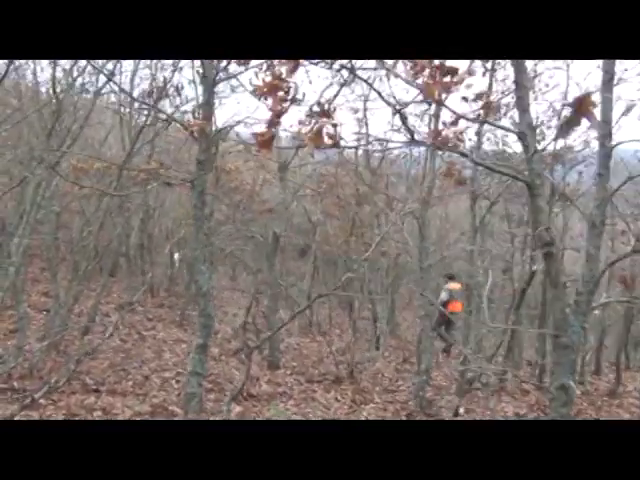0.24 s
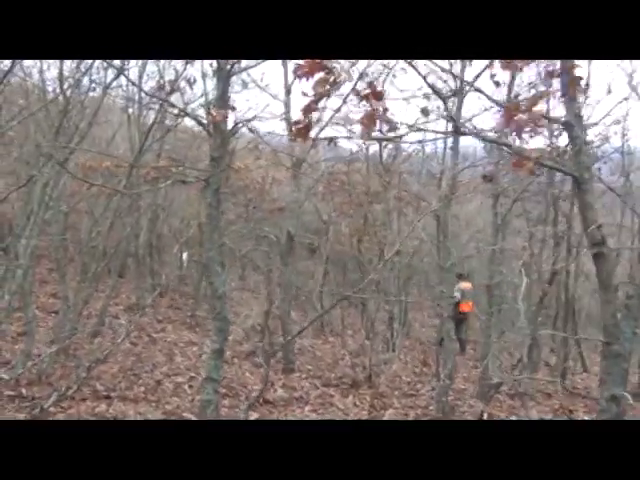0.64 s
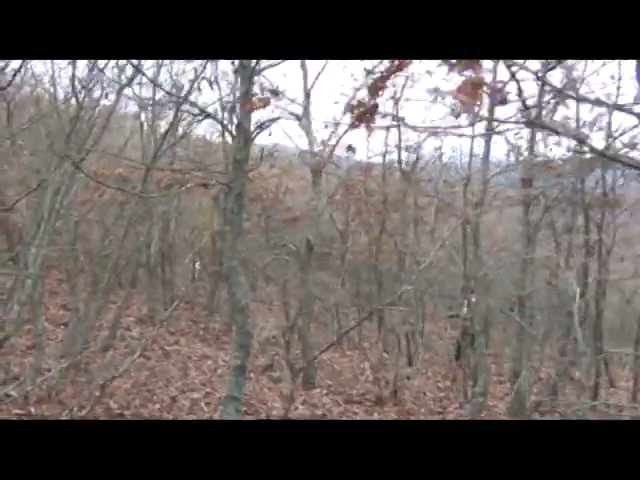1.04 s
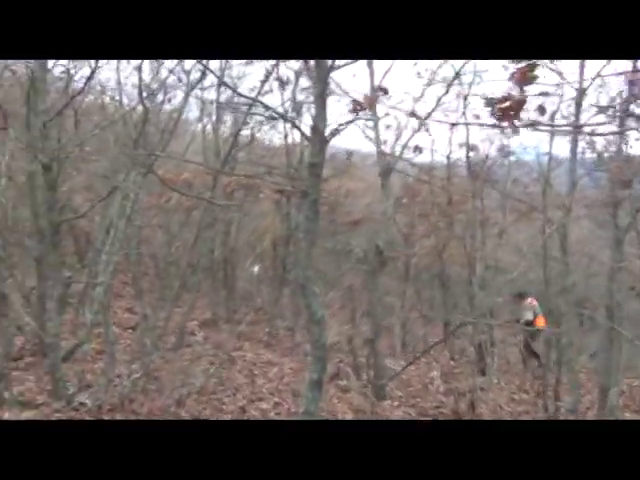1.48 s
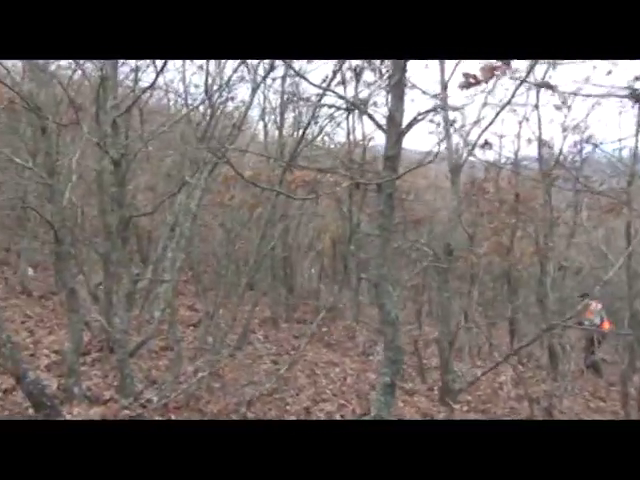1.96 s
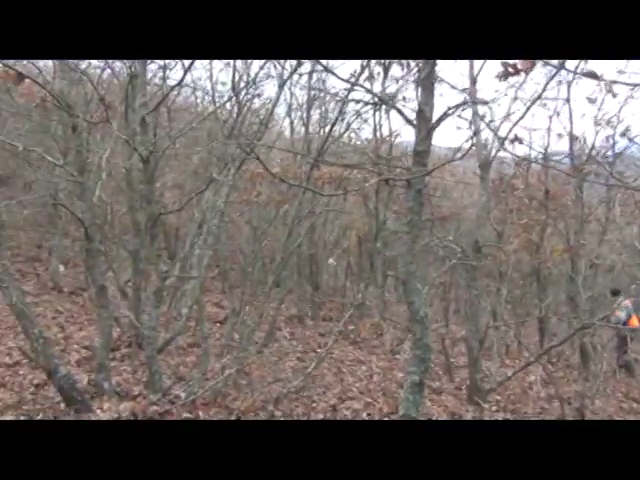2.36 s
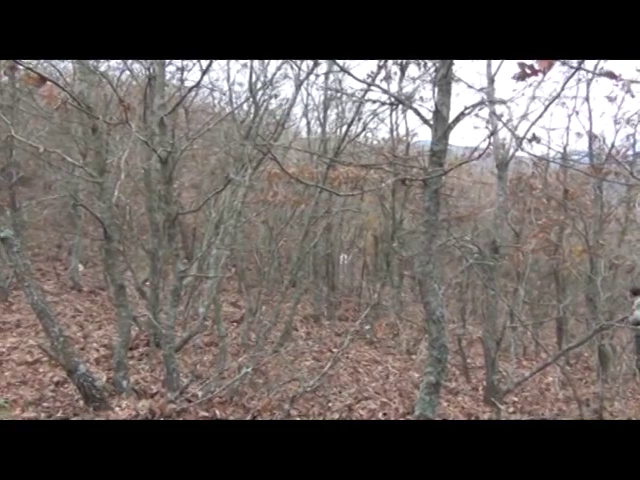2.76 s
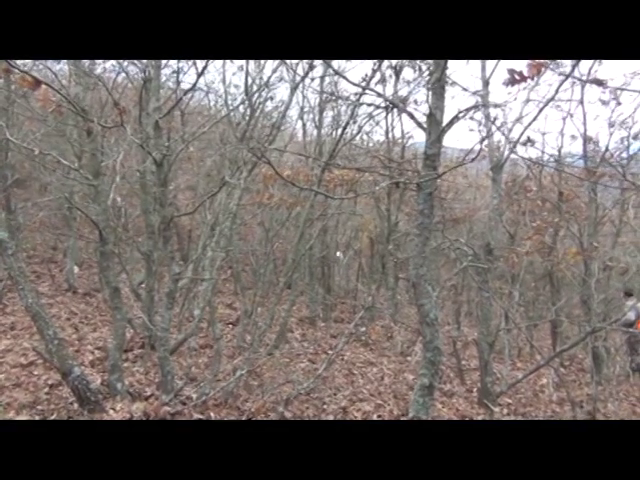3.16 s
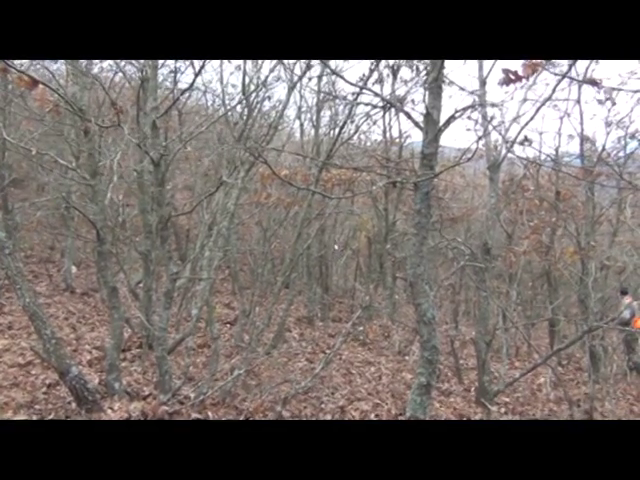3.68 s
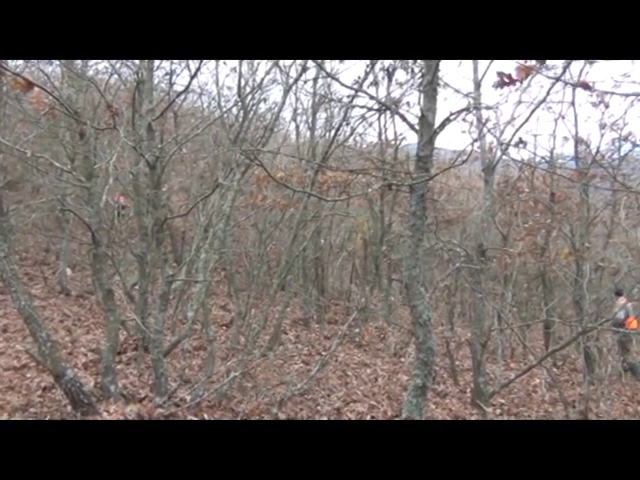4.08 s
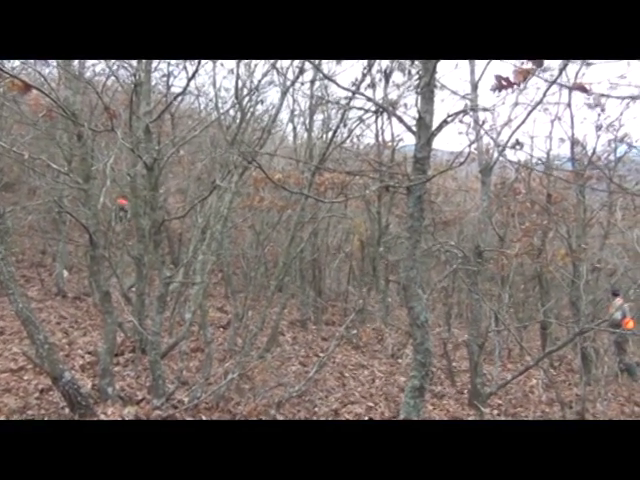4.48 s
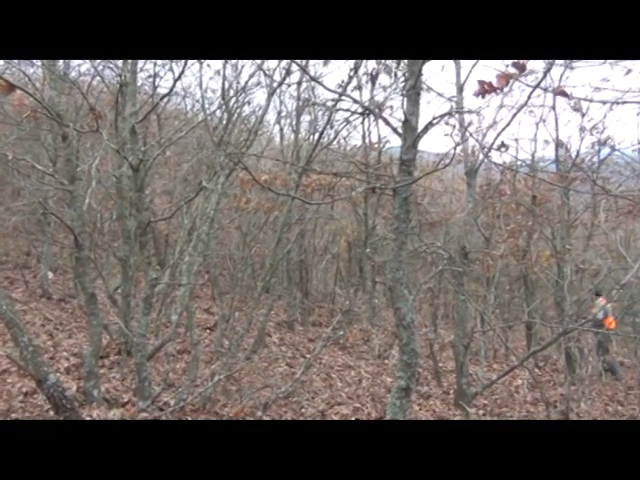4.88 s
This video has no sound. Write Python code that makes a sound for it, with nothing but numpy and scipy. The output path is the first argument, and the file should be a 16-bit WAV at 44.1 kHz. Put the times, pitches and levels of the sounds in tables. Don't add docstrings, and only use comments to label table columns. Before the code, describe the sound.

Feet crunch through dry leaves with snaps and dull knocks, then stop; small collar bells clank in the brush while a bird whistles briefly.

```python
import sys
import numpy as np
from scipy import signal
from scipy.fft import rfft, irfft, next_fast_len
from scipy.io import wavfile
from scipy.ndimage import uniform_filter1d, map_coordinates

SR = 44100
rng = np.random.default_rng(int(sys.argv[2]) if len(sys.argv) > 2 else 0)


def voltage_ratio(level):
    return 10 ** (np.asarray(level, float) / 20)


def generate_wav(sig):
    pcm = np.round(np.clip(np.atleast_2d(sig).T, -1, 1) * 32767).astype(np.int16)
    wavfile.write(sys.argv[1], SR, pcm)


N = 226193
HOP = 32

# [f/Hz, level/dB, t60/s]
LOW_BELL_MODES = [(1509, -6, 0.19), (1488, 0, 0.28), (1922, -21.5, 0.84), (3740, -18, 0.076),
                  (4084, -13.5, 0.34), (4350, -13, 0.42), (4340, -2, 0.18), (7550, -3, 0.36),
                  (7710, -0.5, 0.21), (11290, 1.5, 0.077), (11380, -2, 0.11), (8200, -7, 0.15),
                  (11800, -7, 0.1), (13310, -12, 0.065)]
HIGH_BELL_MODES = [(1572, 3.5, 0.15), (1547, -13.5, 0.33), (2170, -27, .2), (4400, 2, 0.22),
                   (4837, -1, 0.38), (7780, -3, 0.3), (8300, -6.5, 0.23), (11600, -3, 0.12),
                   (12900, -15, 0.12), (14250, -19, .06)]
LOW_COLLAR = (LOW_BELL_MODES, [3000, 6000, 10000])
HIGH_COLLAR = (HIGH_BELL_MODES, [3000, 4600, 6000])


def evened(x):
    return x / np.sqrt(np.mean(x ** 2) + 1e-20)


def smooth_noise(*widths):
    x = rng.standard_normal(N)
    for width in widths:
        x = uniform_filter1d(x, size=width)
    return evened(x)


def read(points, hz):
    f, value = np.transpose(points)
    return np.interp(np.log(hz + 1), np.log(f + 1), value)


def curve(rows):
    s, *columns = np.transpose(rows)
    return [np.interp(np.arange(N) / SR, s, c) for c in columns]


def coloured(x, points):
    size = next_fast_len(N, True)
    gain = voltage_ratio(read(points, np.fft.rfftfreq(size, 1 / SR)))
    return irfft(rfft(x, size) * gain, size)[..., :N]


def left_right(mid, side):
    return np.array([mid + side, mid - side])


def add(mix, s, sound):
    part = mix[..., round(s * SR):][..., :sound.shape[-1]]
    part += sound[..., :part.shape[-1]]


def placed(x, pan_db):
    return x * voltage_ratio(np.array([pan_db / 2, -pan_db / 2]).reshape(2, -1))


def ring(hz, t60, rise=0.00026):
    t = np.arange(int(min(0.7 * t60, 0.3) * SR) + 8) / SR
    decay_per_s = np.log(1000) / t60
    return np.exp((2j * np.pi * hz - decay_per_s) * t).imag * np.minimum(t / rise, 1)


def blurred(rows, width_hz):
    hz, db = curve(rows)
    t = np.arange(N) / SR
    pole = np.exp(-np.pi * width_hz / SR)
    two_poles = np.convolve([1, -pole], [1, -pole])
    slow = signal.lfilter([1], two_poles, [1, 1j] @ rng.standard_normal((2, N)))
    tone = evened((slow * np.exp(2j * np.pi * np.cumsum(hz) / SR)).real)
    return tone * voltage_ratio(db + 4.5) * (t > rows[0][0]) * (t < rows[-1][0])


def stroke(start, end, start_db, end_db, fall_db_per_s, rise_s):
    t = np.arange(0, N, HOP) / SR
    times = [start, (start + end) / 2, end + 1e-4, end + 2]
    levels = [start_db, (start_db + end_db) / 2, end_db, end_db - 2 * fall_db_per_s]
    return (voltage_ratio(np.interp(t, times, levels)) * np.clip(1 + (t - start) / rise_s, 0, 1)) ** 2


def in_db(power):
    return np.interp(np.arange(N), np.arange(0, N, HOP), 10 * np.log10(power + 1e-12))


def footwork():
    # [heel t/s, toe t/s, heel level/dB, toe level/dB, fall/(dB/s)]
    step_rows = [
        (0.0, 0.28, -29.5, -26.5, 77),
        (0.884, 1.085, -27.5, -22.5, 500),
        (1.116, 1.316, -28, -37, 402),
        (1.682, 1.702, -27.5, -27, 88),
        (1.78, 1.894, -33, -26, 179),
        (2.0, 2.026, -47, -46, 37),
    ]
    # [t/s, level/dB, crispness (highs re rustle)/dB]
    scuff_rows = [(.5, -42, -15), (.56, -49, 1), (.6, -39, -4), (.64, -40.5, -2.5), (.74, -41, -1),
                  (.8, -41, -15), (.845, -35, -7), (.69, -43.5, -3), (1.36, -42.5, 1), (1.41, -42.5, 3),
                  (1.63, -31.5, -0.5), (1.47, -39.5, -2), (1.54, -44, -3), (1.59, -46, -6),
                  (1.98, -38, 0.5), (2.1, -43.5, 2.5)]
    # [from t/s, to t/s, first level/dB, last level/dB, ground thud re level/dB]
    press_rows = [(0.0, 0.024, -35, -28, -27), (0.063, 0.26, -32.5, -29, -18),
                  (0.366, 0.5, -34.5, -27.5, -15), (0.53, 0.7, -46.5, -46, -0.5),
                  (.65, 0.75, -44.5, -43, -3), (.72, 1.04, -44, -38, -6), (0.786, 0.8, -26, -29, -11),
                  (0.85, 0.955, -26.5, -28, -4), (0.942, 1.105, -31, -24, -10),
                  (1.11, 1.25, -32, -32, -7.5), (1.24, 1.32, -33.5, -33, -11),
                  (1.32, 1.37, -40, -39.5, -5.5), (1.43, 1.7, -42.5, -48, -3),
                  (1.424, 1.414, -31, -25, -16), (1.52, 1.564, -35, -36, -2.5),
                  (1.588, 1.6, -31, -60, -9.5), (1.653, 1.75, -30.5, -35, -9.5),
                  (1.769, 2.06, -35, -40, -20), (1.901, 3.1, -50.5, -70, -8)]
    # [t/s, level/dB]
    paw_rows = [(2.349, -47), (2.435, -45.5), (2.52, -54), (2.605, -42.5), (2.72, -47.5), (2.825, -48.5),
                (2.901, -44), (3.045, -56), (3.16, -49.5), (3.21, -65), (3.36, -53), (3.43, -53),
                (3.51, -48), (3.59, -45), (3.66, -45.5), (3.71, -48.5), (3.8, -47.5), (3.87, -45.5),
                (3.95, -48.5), (4.059, -51), (4.135, -46), (4.21, -50.5), (4.3, -55), (4.455, -49.5),
                (4.629, -52), (4.69, -53), (4.75, -46), (4.87, -52), (4.92, -48), (5.03, -47.5)]
    step_crisp_db, far_crisp_db, still_db = -0.27, -0.5, -66.5
    steps = sum(stroke(*row, rise_s=0.051) for row in step_rows)
    far = voltage_ratio(2 * still_db) + sum(stroke(s, s, db, db, 102, 0.022) for s, db in paw_rows)
    scuffs = np.array([stroke(s, s, db, db, 242, 0.035) for s, db, _ in scuff_rows])
    presses = np.array([stroke(*row[:-1], 422, 0.029) for row in press_rows])

    bright = steps * voltage_ratio(2 * step_crisp_db) + far * voltage_ratio(2 * far_crisp_db)
    bright = bright + voltage_ratio(2 * np.transpose(scuff_rows)[2]) @ scuffs
    thud = voltage_ratio(2 * np.transpose(press_rows)[-1]) @ presses
    level_db = in_db(steps + far + scuffs.sum(0))
    weight_db = in_db(presses.sum(0))
    return level_db, in_db(bright) - level_db, weight_db, in_db(thud) - weight_db


def crackle(per_s, spread_db, hiss, clump_db, count=8):
    t = np.arange(128) / SR
    clumps = voltage_ratio(clump_db * smooth_noise(260))
    size = voltage_ratio(spread_db * np.minimum(rng.exponential(1, N), 3.6))
    size = size * (rng.random(N) < clumps * per_s / SR)
    kind = rng.integers(count, size=N)
    out = hiss * np.sqrt(clumps) * rng.standard_normal((2, N))
    for k, direction in enumerate(np.linspace(-1.6, 1.6, count)):
        decay_s = rng.uniform(0.0001, 0.0032)
        burst = evened(rng.standard_normal(len(t)) * np.exp(-t / decay_s))
        fractures = signal.oaconvolve(size * (kind == k), burst)[:N]
        out += np.array([[1], [direction]]) * fractures * 0.081
    return evened(out)


def snaps(level_db):
    # [t/s, peak level/dB, f/Hz]
    near_snaps = [(0.1207, -17.5, 5030), (0.1652, -16, 4100), (0.285, -23, 6000), (0.3, -34, 6160),
                  (0.338, -26.5, 2600), (0.393, -26, 6800), (0.574, -31.5, 8100), (0.64, -32, 5440),
                  (0.661, -41, 7000), (0.7248, -43, 9150), (0.852, -27, 2900), (0.916, -21, 6450),
                  (1.002, -17, 5860), (1.016, -14, 8700), (1.089, -27, 9000), (1.123, -24, 2850),
                  (1.549, -39.5, 8200), (0.5652, -26.5, 7200), (0.6002, -34, 3950), (0.616, -33, 7170),
                  (0.758, -37, 3230), (0.7645, -31, 7500), (0.8894, -35, 7260), (0.9326, -20, 8800),
                  (0.9752, -30, 6250), (1.0926, -16, 8900), (1.107, -25, 7340), (1.12, -31, 6840),
                  (1.3508, -48, 9000), (1.44, -39, 9000), (1.5207, -34.5, 6300), (1.6158, -27.5, 9100),
                  (1.659, -30, 6650), (1.8543, -24, 6750), (1.872, -16.5, 9620), (1.881, -17, 9600),
                  (1.894, -18, 9900), (1.9023, -22, 8860), (1.949, -28.5, 9300), (1.986, -17, 8780),
                  (2.0296, -32, 3050), (0.8325, -33, 3290), (0.848, -35, 2040), (1.509, -43, 9900),
                  (1.047, -18, 5270), (1.078, -27, 7000), (0.213, -22, 5600), (0.249, -35, 6500),
                  (0.495, -34, 4570), (1.928, -31, 8460), (2.012, -28, 7500), (2.037, -27.5, 9500)]
    # [t/s, peak level/dB, f/Hz]
    far_snaps = [
        (2.836, -35.5, 4420),
        (3.2315, -33, 3130),
        (3.2335, -28, 9800),
        (4.495, -44, 5200),
        (3.8, -49, 6300),
        (3.863, -39, 4400),
        (4.057, -36, 8900),
        (4.554, -41.5, 6360),
        (4.754, -37, 4700),
    ]
    rows = near_snaps + far_snaps
    out, t = np.zeros((2, N)), np.arange(256) / SR
    for (s, db, hz), noise in zip(rows, rng.standard_normal((len(rows), len(t)))):
        gain = voltage_ratio(db - level_db[round(s * SR)] + 1.5) * np.array([[1], [0.3]])
        crack = np.gradient(uniform_filter1d(noise, size=2)) * np.exp(-t / 0.0003)
        add(out, s, gain * evened(crack) * 0.15)
        add(out, s, gain * ring(hz, t60=15 / hz, rise=0.0001) * 1.4)
    return out


def leaves():
    # [f/Hz, density/dB]
    litter = [(35, -57), (60, -32.5), (278, -8.5), (393, -3.5), (442, -2), (753, -0.5), (1020, -1.5),
              (2300, -2), (3410, -3.5), (5170, -1), (6800, -0.5), (9240, 2), (15400, -10.5)]
    # [f/Hz, side re mid/dB]
    litter_side = [(60, -32), (180, -58), (550, -12.5), (1650, -24), (4970, -4.5), (15000, -1.5)]
    # [t/s, left re right/dB]
    sideways = [(0.0, 2), (0.37, 1), (0.88, 3.5), (2.03, 2), (2.29, -0.5), (3.87, 0), (4.21, -1),
                (4.53, -1), (4.71, -1), (5.13, 2)]
    level_db, crisp_db, weight_db, thud_db = footwork()
    mid, side = crackle(per_s=2200, spread_db=5.5, hiss=0.99, clump_db=2.5)
    both = np.array([mid, coloured(side, litter_side) * voltage_ratio(-3.0)])
    both = coloured(both + snaps(level_db), litter)

    thuds = coloured(both, [(300, 0), (480, -26.5)])
    lows = coloured(both, [(900, 0.0), (2200, -15)]) - thuds
    highs = coloured(both, [(6000, -25.0), (8500, -0.5)])
    body = both - thuds - lows - highs
    rustle = evened(body) * voltage_ratio(level_db - 0.73)
    rustle = rustle + evened(highs) * voltage_ratio(level_db + np.minimum(crisp_db, 4.5) + 0.93)
    ground = evened(lows) * voltage_ratio(weight_db - 7.5)
    ground = ground + evened(thuds) * np.array([[1], [0.45]]) * voltage_ratio(weight_db + thud_db - 4.0)
    turn = voltage_ratio(np.array([[0.5], [-0.5]]) * curve(sideways)[0])
    return left_right(*rustle) * turn + left_right(*ground) * turn ** 0.28


def knocks():
    # [t/s, peak level/dB, f/Hz]
    knock_rows = [(0.389, -10.5, 1600), (0.42, -25, 892), (0.451, -19, 710), (0.495, -19, 940),
                  (0.477, -13, 1100), (0.777, -17, 950), (0.797, -13, 730), (0.846, -17.5, 298),
                  (0.882, -19, 260), (0.929, -15.5, 610), (1.123, -33, 744), (1.15, -18.5, 590),
                  (1.074, -16, 840), (1.186, -17, 510), (1.2, -16, 900), (1.24, -29, 760), (1.1, -15, 790),
                  (.952, -14, 700), (0.96, -17, 1500), (1.4, -13, 1060), (.92, -23, 320), (0.32, -30, 324),
                  (1.263, -18, 780), (1.304, -21, 930), (1.5, -23, 534), (1.621, -19.5, 720),
                  (1.665, -16.5, 416), (4.74, -28, 820), (4.739, -42, 437), (4.74, -26, 1190)]
    out = np.zeros(N)
    for s, db, hz in knock_rows:
        add(out, s, ring(hz, t60=14 / hz, rise=0.41 / hz) * voltage_ratio(db - 2.0))
    return placed(out, 2.2)


def scrape():
    # [t/s, f/Hz, level/dB]
    path = [
        (.38, 1660, -46),
        (.392, 1683, -35),
        (.41, 1301, -38),
        (.43, 832, -43),
        (.455, 760, -41),
        (.48, 1033, -41),
        (.5, 772, -39),
        (.52, 690, -54),
    ]
    return blurred(path, width_hz=410)


def muted(sound, share):
    free_s, mute_s, mute_db = 0.0059, 0.0087, -4.5
    t = np.arange(len(sound)) / SR
    return sound * voltage_ratio(share * mute_db * np.clip((t - free_s) / mute_s, 0, 1))


def clapper_blows():
    # [t/s, peak level/dB, 2nd, 3rd, 4th mode family re hum/dB]
    blows = [(1.959, -31, -20, -16, -12), (1.967, -42.5, 12.5, -6, -6), (1.986, -37, 10.5, -7, 0),
             (2.0825, -50, -13, -13, -3), (2.134, -45, 11, 14.5, -2), (2.38, -53, 4, -8, 5),
             (2.465, -50, 11, -8, -8), (2.4244, -37.5, -0.5, -5, -18), (2.5425, -65, -21, -8, -34),
             (2.5682, -26.5, -7.5, -13, -30), (2.602, -6.5, -5, -17.5, -15.5),
             (2.6799, -25.5, -17, -10.5, -9), (2.7621, -32, -23, -15, -27), (2.802, -38.5, -17, -16, -20),
             (2.9148, -41.5, -18, -18, -5), (3.039, -38, 2, -14, -8), (3.0862, -30.5, -12, -11.5, -18),
             (3.1293, -38, -2, -8, -8), (3.1542, -33.5, 0.5, -6, -1.5), (3.22, -30, -26, -19, -19),
             (3.499, -40.5, -7, -8, -23), (3.5812, -48.5, 20, -6, -4), (3.6153, -29.5, -2.5, -10.5, -22),
             (3.6445, -41, 8, -14, -19), (3.6683, -37.5, -2, -13, -11), (3.716, -29, -6.5, -13, -20),
             (3.81, -43.5, -15, 2, 2), (3.913, -33.5, -11, -24, -30), (4.0841, -38, 1.5, -24, -7),
             (4.1287, -25, -3.5, -21, -12.5), (4.303, -34.5, -22, -21, -33), (4.4657, -35.5, -14, -24, -23),
             (4.499, -38.5, -13, -25, -27), (4.592, -35, -13, -13, -27), (4.635, -45.5, 6.5, -1, -17),
             (4.701, -26, -8, -17, -18), (4.788, -32, -9, -30, -18), (4.8294, -41, 1, -22, -16),
             (4.8893, -29.5, -11, -21, -29), (4.9156, -15, -7, -28, -27), (5.0262, -38, 15, -8, -28),
             (5.081, -34.5, -30, -19, -30), (5.112, -35, -24, -17, -24),
             (1.7507, -32, -14, -25, -20), (2.024, -38, -12, -18, -18), (2.1414, -43, 11, -4, -6),
               (2.82, -48, 4, -10, -12), (2.9, -48, 9, -8, -8), (3.099, -40.5, 11, -12, -10),
               (3.184, -42, 3, -3, -1), (3.565, -50, 13, -4, -8), (4.174, -39.5, 6, -8, -6),
               (4.944, -24.5, -10, -20, -34), (2.639, -24, -16, -10, -26), (3.76, -38.5, -3, -14, -14)]
    # [t/s, peak level/dB, 2nd, 3rd, 4th family re hum/dB]
    high_blows = [(2.852, -44, -13, -14, -14), (2.8875, -44, -17, -16, -1), (3.3374, -36, -19, -22, -11),
                  (3.3614, -42, -4, -12, -8), (3.405, -44, -6, -19, -4), (3.4326, -40.5, -7, -17, -14),
                  (3.5138, -41, -9, -14, -17), (3.8998, -45, -2, 5, -15), (4.0975, -36.5, -24, -23, -19),
                  (4.1396, -21.5, -15, -22, -21), (4.1875, -34.5, -3.5, -3, -12),
                  (4.3171, -32, -27, -33, -25), (4.3874, -47, -16, -10, -7), (4.4496, -45, -10, -18, -15),
                  (4.6634, -33.5, -18, -8, -20), (4.7568, -28, -15, -5.5, -18), (4.848, -44, -8, -16, -21)]
    # [t/s, peak level/dB, 2nd family re hum/dB]
    far_blows = [(.545, -24, -22), (0.634, -24.5, -20), (0.678, -23, -22), (0.7, -16.5, -20),
                 (0.731, -23, -22), (0.788, -18, -22), (1.433, -20.5, -12), (1.47, -29, -6),
                 (1.5266, -19, -15), (1.555, -18, -14), (1.5773, -19, -20), (1.611, -21, -20)]
    free_db, damping_per_db = -18, 0.02
    upper_mute = 0.53
    rows = [(*LOW_COLLAR, 1.4, *row) for row in blows]
    rows += [(*HIGH_COLLAR, -2.8, *row) for row in high_blows]
    rows += [(*HIGH_COLLAR, -0.8, s, db - 14.0, upper_db, -25, -22) for s, db, upper_db in far_blows]
    jitters = rng.uniform(-1.17, 1, (len(rows), len(LOW_BELL_MODES)))
    out = np.zeros((2, N))
    for (modes, edges, pan_db, s, db, *family_db), jitter in zip(rows, jitters):
        length = max(1 - damping_per_db * max(db - free_db, 0), 0.1)
        for (f, mode_db, t60), j in zip(modes, jitter):
            family = np.searchsorted(edges, f)
            family_gain_db = [0, *family_db][family] + 1.1 * (family > 0)
            gain = voltage_ratio(db + mode_db + family_gain_db + 0.91 * j - 2.0)
            tone = ring(f * (1 + 0.0027 * j), t60 * length, rise=6.8 / f)
            tone = muted(tone, upper_mute if family else 1)
            add(out, s - 0.0018, placed(tone, pan_db) * gain)
        add(out, s, ring(9790, t60=0.0091) * voltage_ratio(db + family_db[-1] + 7.5))
        add(out, s, ring(4600, t60=0.006) * voltage_ratio(db + family_db[0] - 19.5))
    return out


def clapper_chatter():
    # [t/s, level/dB]
    chatter = [(1.9, -51), (1.95, -30.5), (2.03, -30), (2.17, -46), (2.45, -41), (2.62, -60), (2.77, -35),
               (2.89, -53), (3.81, -43), (3.99, -43), (4.15, -31), (4.33, -36), (4.45, -54), (4.59, -44),
               (4.85, -46), (5.13, -51)]
    ticks = voltage_ratio(1.9 * rng.exponential(1, (2, N))) * (rng.random((2, N)) < 110 / SR)
    ticks = ticks * (np.arange(N) > chatter[0][0] * SR)
    out = np.zeros((2, N))
    for train, (modes, edges), pan_db in zip(ticks, (LOW_COLLAR, HIGH_COLLAR), (1.2, -2.4)):
        body = np.zeros(SR // 3)
        for f, mode_db, t60 in modes:
            add(body, 0, ring(f, t60, rise=4.4 / f) * voltage_ratio(mode_db - 4.7 * np.searchsorted(edges, f)))
        rattle = signal.oaconvolve(train * voltage_ratio(curve(chatter)[0] - 19), body)[:N]
        out += placed(rattle, pan_db)
    return out


def bells():
    sway_s, flutter_db = 3.2e-5, 2.02
    still = clapper_blows() + clapper_chatter()
    flutter = smooth_noise(250, 250)
    arrival = np.arange(N) + sway_s * SR * smooth_noise(900, 600)
    swung = np.array([map_coordinates(channel, [arrival], order=3) for channel in still])
    return swung * voltage_ratio(flutter_db * flutter)


def bird():
    # [t/s, f/Hz, level/dB]
    notes = [
        [(2.22, 2310, -52), (2.24, 2274, -53.5), (2.34, 2040, -41.5), (2.375, 1964, -47)],
        [(2.37, 2230, -42), (2.39, 2190, -39.5), (2.44, 2204, -44.5), (2.48, 2160, -43)],
        [(2.48, 2610, -13), (2.492, 2615, -36.5), (2.61, 2604, -37.5), (2.65, 2514, -44), (2.7, 2463, -50),
         (2.8, 2390, -55)],
    ]
    out = np.zeros(N)
    for rows in notes:
        s, hz, db = np.transpose(rows)
        t = np.arange(s[0], s[-1], 1 / SR)
        tremble = 1 + 0.0051 * evened(uniform_filter1d(rng.standard_normal(len(t)), size=400))
        note = np.sin(2 * np.pi * np.cumsum(np.interp(t, s, hz) * tremble) / SR)
        add(out, s[0], voltage_ratio(np.interp(t, s, db) + 2.5) * note * signal.windows.tukey(len(t), 0.12))
    return out


def far_bell():
    # [t/s, f/Hz, level/dB]
    jingles = [
        (2.97, 2100, -57),
        (3.38, 2114, -61),
        (3.99, 2080, -61),
        (4.2, 2174, -54),
        (4.39, 2120, -57),
        (4.7, 2170, -53.5),
        (4.9, 2126, -49),
    ]
    rise_s, dip_db = 0.101, 15.5
    rows = []
    for s, hz, db in jingles:
        rows += [(s - rise_s, hz, db - dip_db), (s, hz, db)]
    rows.append((s + 2 * rise_s, hz, db - dip_db))
    return blurred(rows, width_hz=105)


def trunks(x, t60):
    t = np.arange(SR) / SR
    taps = rng.choice([-1., 1.], SR) * (rng.random(SR) < 1500 / SR)
    taps = taps * voltage_ratio(-60 * t / t60) * (t > 0.006)
    taps = np.array([taps, taps * np.where(rng.random(SR) < 0.06, -1, 1)])
    return signal.fftconvolve(x[None], taps / np.linalg.norm(taps[0]), axes=1)[:, :N]


def air():
    # [f/Hz, density/dB]
    spectrum = [(20, -22), (60, -12), (200, -4), (600, 0.5), (1200, -0.5), (2500, -6), (3400, -4),
                (6000, -10.5), (10000, -12.5), (16000, -13.5)]
    # [f/Hz, side re mid/dB]
    width = [(40, -26), (150, -9), (1000, -5.5), (4000, -2.5), (12000, -4)]
    level_db, flicker_db = -49.5, 1.7
    mid, side = rng.standard_normal((2, N))
    mid, side = coloured(np.array([mid, coloured(side, width)]), spectrum)
    return voltage_ratio(level_db + flicker_db * smooth_noise(2500)) * evened(left_right(mid, side))


def wind():
    # [t/s, level/dB]
    puff_rows = [
        (0.0, -52),
        (.31, -49),
        (.57, -56),
        (0.911, -81.5),
        (2.48, -54),
        (3.06, -63),
    ]
    breeze_db = -64
    lumps = coloured(rng.standard_normal((2, N)),
                     [(15, -23), (50, -12.5), (110, -7.0), (300, -11.0), (600, -62)])
    puffs = sum(stroke(s, s, db, db, fall_db_per_s=110, rise_s=0.15) for s, db in puff_rows)
    level_db = in_db(puffs + voltage_ratio(2 * breeze_db)) - 5.0
    return evened(left_right(lumps[0], 0.08 * lumps[1])) * voltage_ratio(level_db)


def scene():
    ground = leaves() + knocks() + scrape()
    background = far_bell() + air() + wind()
    metal, song = bells(), bird()
    scatter = voltage_ratio(-0.5) * trunks(metal.mean(0), t60=0.13) + voltage_ratio(-3.0) * trunks(song, t60=0.59)
    return ground + metal + song + scatter + background


def low_pass(x):
    return signal.sosfilt(signal.butter(12, 16820, fs=SR, output="sos"), x)


def record(dry):
    soft = 0.95 * np.tanh(dry / 0.95)
    lowpass = signal.firwin(401, 15750, window=("kaiser", 8), fs=SR)
    band = signal.oaconvolve(soft, lowpass[None], "same")
    return low_pass(band)


dry = scene()
out = record(dry)
generate_wav(out)
```